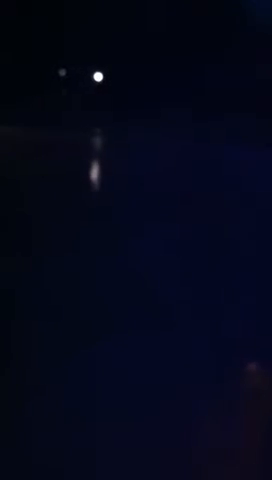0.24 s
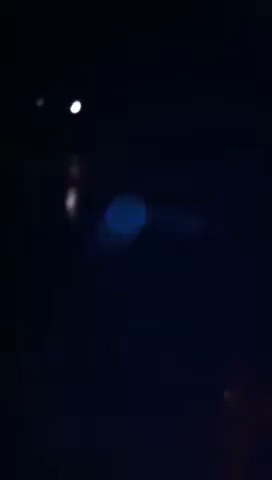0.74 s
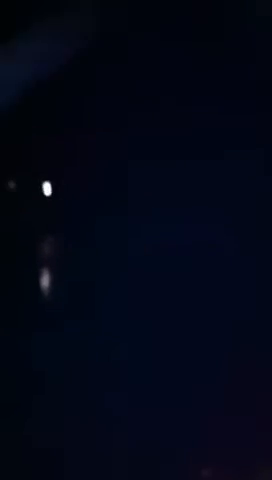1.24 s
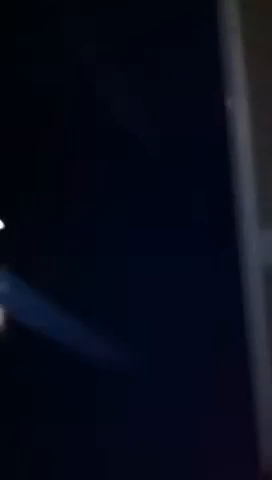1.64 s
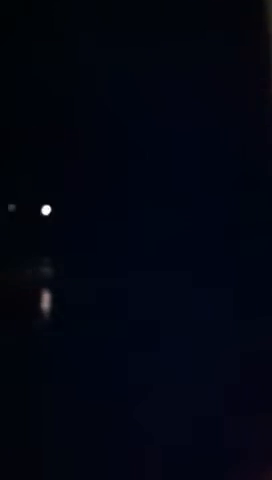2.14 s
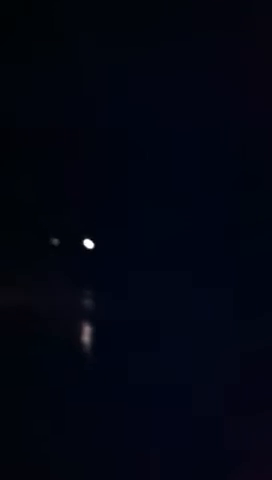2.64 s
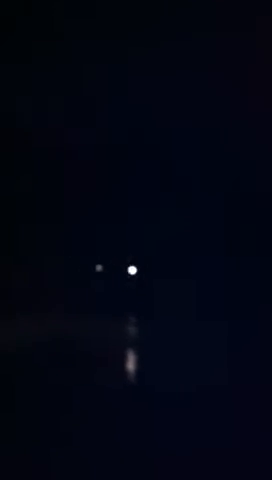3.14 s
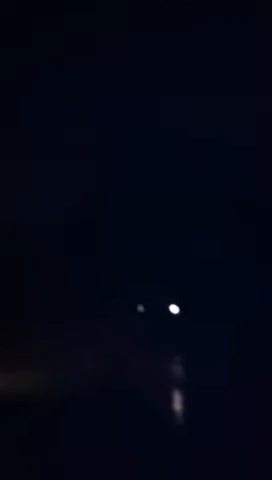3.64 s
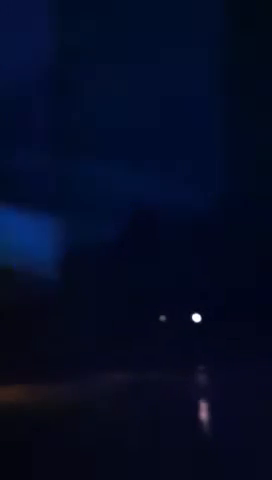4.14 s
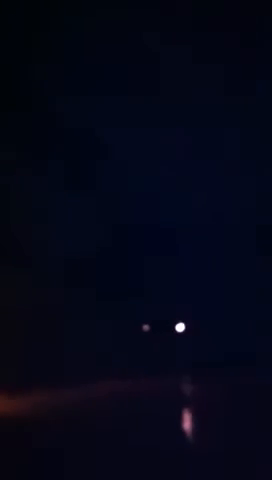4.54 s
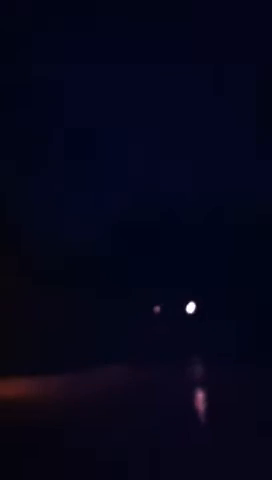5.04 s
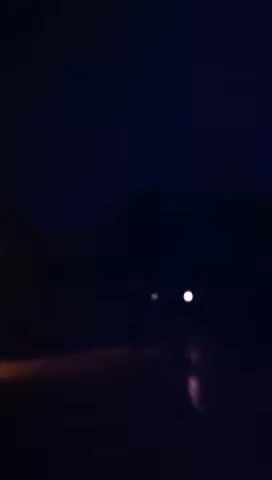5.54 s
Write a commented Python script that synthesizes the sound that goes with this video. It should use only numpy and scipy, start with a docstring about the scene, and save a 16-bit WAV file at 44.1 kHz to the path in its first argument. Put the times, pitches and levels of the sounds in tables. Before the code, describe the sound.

Deep thunder opens at full strength, stumbles through uneven bursts and rolls off into the distance. Water drops splat very near the microphone, irregular and bright, some loud, some faint, each with a short wet spray. Behind them is a quiet hiss and patter of street rain. The background dips briefly after four seconds, then the thunder grows again.

```python
"""Thunder over a rainy street

Thunder rolls away at night in steady rain, heard from a doorway: scattered shocks, dulled by distance.
Water dripping off the eaves splats on hard ground close by: slap, popping air pocket and spray.
Farther drops merge into a patter of click-driven puffs and a wash of noise with an unsteady spectrum."""
import sys
import numpy as np
from scipy import signal
from scipy.io import wavfile
from scipy.ndimage import uniform_filter1d

SR = 44100
rng = np.random.default_rng(int(sys.argv[2]) if len(sys.argv) > 2 else 0)


def wav_out(sig):
    """Save sig, one row per channel (or a flat mono array), as 16-bit PCM at SR to the path in sys.argv[1]."""
    wavfile.write(sys.argv[1], SR, np.round(np.clip(np.atleast_2d(sig).T, -1, 1) * 32767).astype(np.int16))


N = 255780

# Course of the thunder. Each row: time in seconds, level in dB before the deep lift,
# nearness from 0 to 1 (how much of the upper rumble survives the air).
THUNDER_COURSE = [(0, -15.5, 0.27), (.15, -12.5, 0.67), (.26, -15, 0.46), (.37, -14, 0.55), (.5, -17, 0.33),
                  (.6, -21.5, 0.28), (.72, -19, 0.4), (.82, -14.5, 0.78), (.87, -19.5, 0.3),
                  (1.05, -21, 0.5), (1.16, -18.5, 0.84), (1.24, -23.5, .5), (1.35, -25, 0.35),
                  (1.7, -27.5, 0.64), (2.05, -28, 0.3), (2.4, -24.5, .4), (2.7, -27, 0.45),
                  (3.4, -31.5, 0.45), (4.2, -31.5, 0.47), (4.9, -30.5, 0.54), (5.45, -31.5, 0.3),
                  (5.8, -25, 0.87)]
# Spectrum of near thunder before the doorway boom. Each row: frequency in Hz, relative density in dB per Hz.
NEAR_THUNDER = [(18, -68), (30, -40), (101, -23.5), (167, 0.5), (255, -2), (327, -9.5), (397, -11),
                (1100, -29.5), (1360, -31.5), (1500, -27.5), (1750, -37.5), (3000, -52), (3900, -50),
                (6600, -120)]
# Spectrum of far thunder before the doorway boom. Each row: frequency in Hz, relative density in dB per Hz.
FAR_THUNDER = [(18, -60), (30, -23.5), (91, -22.5), (157, -1), (228, -6), (379, -11.5), (447, -16.5),
               (509, -12.5), (1290, -25), (1500, -26), (1950, -64), (3300, -120)]
# Air modes of the doorway. Each row: frequency in Hz, half-width in Hz, boost in dB.
DOORWAY_MODES = [(158.4, 3.4, 6.5), (196, 4.3, 2.5), (295, 5.2, 1.5), (391, 30, 3.5)]
# Drips from the eaves. Each row: start in seconds, peak in dB, slap pitch in Hz, settled pop pitch in Hz,
# spray tilt in dB per octave, slap over spray in dB, pop over spray in dB (both before their fades).
EAVES_DRIPS = [(.055, -10, 3980, 1210, -2, 1, -2.5), (.1306, -7.5, 6300, 1190, -3.5, 1, -6),
               (.1628, -18, 9960, 869, -3, 8.5, 4), (.2294, -16, 2860, 934, 4, 9, -5),
               (.391, -17, 3060, 1600, -10, 8, 7), (.4305, -9.5, 6710, 1120, 1, 2.5, -14),
               (.4384, -10, 3450, 3450, -8, 16, 7), (.4985, -18, 11300, 1050, -5, 19, -5),
               (.5427, -2.5, 8600, 910, -4.5, 16.5, -21), (.575, -16, 4940, 931, -1, 1, -8),
               (.616, -17, 2500, 2500, -5, 8, -13), (.6578, -2, 6230, 1070, 3, 4, 6),
               (.6684, -9, 10500, 1570, 3, 16, 7), (.7203, -18, 5000, 956, -2.5, 16, -9),
               (.83, -15.5, 4030, 972, -2, 3, -14), (.92, -10.5, 5400, 2100, 0.5, 3.5, -2),
               (.9693, -9.5, 6560, 1160, -1, 9.5, -5), (1.037, -16.5, 11900, 869, 6, 7, -8),
               (1.249, -19.5, 2660, 896, 1, 15, -5), (1.3491, -14.5, 4040, 2820, -4.5, 4, 3),
               (1.4351, -18, 4630, 926, 11, -1, -10), (1.4536, -20, 9470, 1030, -1, 6, 9),
               (1.502, -14.5, 11000, 861, 3, 15, -1), (1.533, -2.5, 3100, 3050, -1.5, 4.5, -14),
               (1.5813, -21, 3960, 3280, -6, 14, -2), (1.6022, -16, 3560, 3120, -1.5, 5, -2),
               (1.668, -14.5, 7900, 1160, 2, 17, -2), (1.7127, -18, 3180, 1450, -5.5, 2, 4),
               (1.7687, -9.5, 3440, 3460, 5, -10, -9), (1.8689, -9, 8360, 2700, -5.5, 13.5, -6),
               (1.943, -8, 4470, 3150, -3.5, 12.5, 1), (1.9534, -10, 8090, 1900, -1, 0, -17),
               (2.0686, -11.5, 2930, 2870, -7, 4, 4.5), (2.161, -11.5, 4000, 3450, -3, 7.5, 1),
               (2.1936, -14, 3980, 2180, -3, 3, 4), (2.2664, -17.5, 2760, 964, -3.5, 7.5, -5),
               (2.3356, -6.5, 3380, 3380, -4, 0, -12), (2.361, -5.5, 10600, 3160, 3.5, 6, -13),
               (2.414, -17, 2700, 2680, -4, 3, 2), (2.4318, -9.5, 6500, 1620, -4.5, -5, -7),
               (2.4927, -17, 7130, 2730, 2, 8, -10), (2.5995, -13.5, 2960, 2960, -2.5, 3, -7),
               (2.7453, -15, 5630, 1900, -3, 6, -10), (2.7997, -10, 8000, 1950, -3, 12, -5),
               (2.8489, -20, 2820, 2180, -.5, 5, 7), (3.0328, -14.5, 5900, 2360, 0, 5, -8),
               (3.059, -14.5, 2900, 2870, -5, 2, -5), (3.1287, -16.5, 2690, 2690, -1.5, 0, 0),
               (3.1598, -8.5, 5570, 1590, 0.5, 3, -11), (3.249, -17, 6590, 1520, 0, 2, -10),
               (3.3852, -10, 3560, 1700, -2, 5, -6), (3.482, -18.5, 6690, 2150, -.5, 6, -5),
               (3.5316, -16, 3950, 3070, 2, 11, -5), (3.5857, -8, 3650, 1980, -1.5, 10, -9),
               (3.6185, -16, 5600, 1890, 2, 8, -8), (3.6724, -10, 8470, 1840, -.5, 8.5, -16),
               (3.7736, -9.5, 3320, 3400, 2.5, -3, -1), (3.8583, -11.5, 5770, 1040, 5, 16, -9),
               (3.9404, -11.5, 12900, 960, -0.5, 4, -3.5), (3.9567, -6, 9220, 1460, 0, 1, 2.5),
               (4.009, -15.5, 2500, 860, -5, 14, 1), (4.0597, -13.5, 10700, 3470, 6, 18, -9),
               (4.09, -6.5, 4930, 3440, -1, 7.5, 8), (4.0981, -4.5, 3510, 690, -9.5, 9, -0.5),
               (4.1194, -19, 3050, 1070, -9, 0, 10), (4.1909, -16.5, 3360, 3300, -4, 9, 6),
               (4.2718, -9, 2920, 2920, -2, -1, -7), (4.2947, -6.5, 3120, 1840, -1, 13.5, 1),
               (4.2977, -8, 2740, 1920, -4, 13, 0), (4.4383, -20, 3580, 2220, -7, 14.5, 6),
               (4.5353, -12.5, 3250, 1580, -2, 7, 1), (4.5875, -11.5, 10000, 1670, -2, 1, -0.5),
               (4.6784, -11.5, 6470, 3450, -2.5, 10.5, 3), (4.698, -11, 5620, 3480, 13, 2, -18),
               (4.724, -16, 2540, 1140, -7.5, 4.5, 4.5), (4.788, -16.5, 5050, 1380, -2.5, 8, -11),
               (4.8722, -17, 9750, 1770, 6, 0, -15), (4.9725, -14.5, 4130, 853, -4.5, 6, -8),
               (5.0389, -8.5, 11700, 1580, 2, 3, -4.5), (5.125, -14.5, 2730, 2680, -4, 9, 3),
               (5.146, -16.5, 4810, 1000, 1, 13, -1), (5.1926, -15.5, 4970, 1600, -5, 3, -1),
               (5.2012, -15, 3580, 1490, -2, 7, -5), (5.2623, -16.5, 2520, 1030, -2, -7, 3),
               (5.2995, -15.5, 4120, 2280, -5, 3, 2), (5.3288, -16.5, 6800, 1890, -8, 9, -2),
               (5.4506, -8, 3120, 1210, -2, 5.5, -5.5), (5.5823, -18, 3400, 3520, -4, 6, 11)]
# Spectrum of splashing water. Each row: frequency in Hz, relative density in dB per Hz.
SPLASH_SPECTRUM = [(150, -81), (400, -29.5), (900, -4.5), (1600, -3), (3000, 0), (6000, 3.5), (10000, 3),
                   (16000, 2.5)]
# Swell of the street rain. Each row: time in seconds, level in dB shared by wash and patter.
RAIN_COURSE = [(0, -32), (.8, -37), (1.15, -36), (1.5, -34), (2.0, -34.5), (2.9, -33.5), (4.15, -31.5),
               (4.7, -33.5), (4.95, -37.5), (5.2, -34), (5.8, -35.5)]
# Mean spectrum of the far rain. Each row: frequency in Hz, relative density in dB per Hz.
WASH_SPECTRUM = [(290, 0.5), (500, 0), (620, -1), (802, -4), (1340, -3.5), (1790, -4), (5620, -6.5),
                 (7270, -11), (10100, -8), (15300, -13)]

# Lift of the thunder's deepest part: dB at a level of -25.5 dB, and further dB per dB of level.
DEEP_DB, DEEP_PER_DB = 1, 0.51
# Spray's 60 dB fade at a peak of -9 dB, and its change in s per dB: fainter drips are farther and ring longer.
SPRAY_T60_S, T60_PER_DB = .1, -.004
# Faint drips: middle peak level and spread either way, tilt either way in dB per octave, slap and pop over spray.
FAINT_COUNT = 40
FAINT_DB, FAINT_SPREAD_DB, FAINT_TILT_DB, FAINT_SLAP_DB, FAINT_POP_DB = -21, 5, 3.5, 1.5, -7
# Roll and rain dip together after a loud drip: start, depth, then fall, hold and return times.
DIP_S, DIP_DB, DIP_FALL_S, DIP_HOLD_S, DIP_BACK_S = 4.3, -5.5, .03, 0.24, 0.16


def gain_of(db):
    """Logarithmic level: every 20 dB is a tenfold amplitude."""
    return 10 ** (np.asarray(db) / 20)


def evened(x):
    """Normalization: equal rms means equal mean power, here 1."""
    return x / np.sqrt(np.mean(x ** 2) + 1e-20)


def bins(size):
    """Discrete spectrum: the frequencies in Hz of a real transform."""
    return np.fft.rfftfreq(size, 1 / SR)


def read(points, hz):
    """Logarithmic pitch: spectrum points are joined on a log-frequency axis."""
    f, value = np.transpose(points)
    return np.interp(np.log(hz + 1), np.log(f + 1), value)


def coloured(x, db):
    """Minimum-phase filter: the phase of a causal response follows from its log gain."""
    both_sides_db = np.concatenate([db, db[-2:0:-1]])
    log_gain = np.log(gain_of(np.maximum(both_sides_db, -100)))
    response = np.exp(np.conj(signal.hilbert(log_gain)))
    taps = np.fft.ifft(response).real
    return signal.oaconvolve(x, taps[:len(db)])[:len(x)]


def band(x, hz, width):
    """Resonance: a band around one pitch is selected; width is a share of that pitch."""
    edges = np.clip([hz / (1 + width), hz * (1 + width)], 100, .45 * SR)
    return evened(signal.sosfilt(signal.butter(1, edges, "bandpass", fs=SR, output="sos"), x))


def clicks(per_s, spread_db):
    """Shot noise: independent impulses of either sign, a few of them large."""
    sign, chance = rng.choice([-1., 1.], N), rng.random(N)
    size_db = spread_db * np.minimum(rng.exponential(1, N), 4)
    return sign * (chance < per_s / SR) * gain_of(size_db)


def add(mix, s, sound):
    """Superposition: pressures add, from time s on."""
    part = mix[round(s * SR):][:len(sound)]
    part += sound[:len(part)]


def thunder():
    """Scattered arrivals: shocks from all along the channel, dulled by distance; the doorway booms."""
    s, *columns = np.transpose(THUNDER_COURSE)
    level_db, near = (np.interp(np.arange(N) / SR, s, c) for c in columns)
    near, hz = np.clip(near, 0, 1), bins(size=16384)
    shocks = clicks(per_s=4000, spread_db=1.5)
    boom_db = sum(db / (1 + ((hz - f) / width) ** 2) for f, width, db in DOORWAY_MODES)
    sharp = evened(coloured(shocks, read(NEAR_THUNDER, hz) + boom_db))
    dull = evened(coloured(shocks, read(FAR_THUNDER, hz) + boom_db))
    roll = surging(near * sharp + (1 - near) * dull, patchy_db=2.0)
    deep = signal.sosfiltfilt(signal.butter(2, 125, fs=SR, output="sos"), roll)
    deep_lift_db = DEEP_DB + DEEP_PER_DB * (level_db + 25.5)
    return gain_of(level_db) * (roll - deep + gain_of(deep_lift_db) * deep)


def surging(x, patchy_db):
    """Source geometry: bends of the channel favour now one pitch range, now another."""
    z = signal.stft(x, nperseg=2048, noverlap=1536)[2]
    patches = rng.standard_normal(z.T.shape)  # time by frequency
    patches = uniform_filter1d(patches, size=9, axis=0)
    patches = evened(uniform_filter1d(patches, size=4, axis=1))
    return signal.istft(z * gain_of(patchy_db * patches).T, nperseg=2048, noverlap=1536)[1][:N]


def drip(peak_db, slap_hz, pop_hz, tilt_db, slap_db, pop_db):
    """Drop impact: a slap, the pop of trapped air, then a crown of droplets in a darkening spray."""
    t, hz = np.arange(6000) / SR, bins(size=1024)
    hiss, air, smack = rng.standard_normal((3, len(t)))
    # Droplets tick at random moments in four bands of random pitch.
    landings = (rng.random((4, len(t))) < 70 / SR) * rng.standard_normal((4, len(t)))
    droplets = sum(band(x, f, 0.14) for x, f in zip(landings, rng.uniform(1580, 13200, 4))) / 2

    fade_db = -60 * t / max(SPRAY_T60_S + T60_PER_DB * (peak_db + 9), .02)
    colour_db = read(SPLASH_SPECTRUM, hz) + tilt_db * np.log2(np.maximum(hz, 1000) / 4000)
    bright = evened(coloured(hiss + 0.66 * droplets, colour_db))
    dark = evened(coloured(bright, -3. * np.log2(1 + hz / 2500)))
    late = 1 - np.exp(-t / 0.028)  # the fine mist settles first
    spray = (1 - late) * bright + late * dark
    spray = spray * gain_of(fade_db) * (1 - np.exp(-t / 0.0014))

    slap = band(smack, slap_hz, 0.37)
    slap = slap * gain_of(slap_db - 60 * t / 0.014) * (1 - np.exp(-t / 0.00063))

    sinking = np.exp(-t / 0.012)  # the pocket of air widens, so its pitch falls
    early_pop = band(air, 1.234 * pop_hz, 0.15)
    settled_pop = band(band(air, pop_hz, 0.07), pop_hz, 0.76)
    pop = sinking * early_pop + (1 - sinking) * settled_pop
    pop = pop * gain_of(pop_db + 1.23 * fade_db) * (1 - np.exp(-t / 0.0039))

    splat = slap + spray + pop
    return gain_of(peak_db) * splat / abs(splat).max()


def faint_drips():
    """Random arrivals: small drips at independent moments, each with its own pitches and colour."""
    when, size, slap, pop, tilt = rng.random((FAINT_COUNT, 5)).T
    start_s = when * N / SR
    peak_db = FAINT_DB + FAINT_SPREAD_DB * (2 * size - 1)
    slap_hz, pop_hz = 2600 * 4.0 ** slap, 870 * 3.6 ** pop
    tilt_db = FAINT_TILT_DB * (2 * tilt - 1)
    slap_db, pop_db = np.full(FAINT_COUNT, FAINT_SLAP_DB), np.full(FAINT_COUNT, FAINT_POP_DB)
    return np.transpose([start_s, peak_db, slap_hz, pop_hz, tilt_db, slap_db, pop_db])


def rain():
    """Superposed drops: wash and patter swell together under one level."""
    s, level_db = np.transpose(RAIN_COURSE)
    level = gain_of(np.interp(np.arange(N) / SR, s, level_db))
    return level * (gain_of(0.43) * wash() + gain_of(-6.5) * patter())


def patter():
    """Impulse response: middle-distance drops are puffs of twelve pitches, each driven by its own clicks."""
    t, out = np.arange(1500) / SR, np.zeros(N)
    for hz in np.geomspace(1500, 13000, num=12):
        ring = np.sin(2 * np.pi * hz * t) * gain_of(-60 * t * hz / 7.8)  # dies in a few cycles
        puff = 0.55 * rng.standard_normal(len(t)) * gain_of(-60 * t / 0.027)
        drop = ring * hz ** 0.31 / 12 + puff
        out += signal.oaconvolve(clicks(per_s=30, spread_db=6.5), drop)[:N]
    return evened(coloured(out, read(SPLASH_SPECTRUM, bins(size=1024))))


def wash():
    """Gaussian noise: far rain as random short-time spectra, with drifting patches and a shared flicker."""
    frames = N // 128 + 5
    a, b, patches = rng.standard_normal((frames, 257, 3)).T  # each frequency by time
    patches = uniform_filter1d(patches, size=8, axis=0)
    patches = evened(uniform_filter1d(patches, size=14, axis=1))
    flicker = evened(uniform_filter1d(rng.standard_normal(frames), size=6))  # the same at all pitches
    unsteady_db = 1.6 * patches + 1.2 * flicker
    mean_db = read(WASH_SPECTRUM, bins(size=512))[:, None]
    z = (a + 1j * b) * gain_of(mean_db + unsteady_db)
    return evened(signal.istft(z, nperseg=512, noverlap=384)[1][:N])


def dip():
    """Level envelope: a common gain falls quickly, stays low, and comes back."""
    corners_s = np.cumsum([DIP_S, DIP_FALL_S, DIP_HOLD_S, DIP_BACK_S])
    return gain_of(np.interp(np.arange(N) / SR, corners_s, [0, DIP_DB, DIP_DB, 0]))


def scene():
    """Superposition: near drips stand over the bed of thunder and street rain, which alone dips."""
    near = np.zeros(N)
    bed = dip() * (thunder() + rain())
    for s, *rest in [*EAVES_DRIPS, *faint_drips()]:
        add(near, s, drip(*rest))
    return (bed + near)[None]


def record(dry):
    """Microphone response: the lowest bass steps down, a soft knee rounds peaks, then the band limit."""
    high = signal.sosfiltfilt(signal.butter(8, 74, "highpass", fs=SR, output="sos"), dry)
    thin = high + gain_of(-11.5) * (dry - high)
    over = np.maximum(abs(thin) - .55, 0)  # the excess above the knee
    held = thin - np.sign(thin) * (over - .2 * np.tanh(over / .2))
    band_limit = signal.firwin(511, 15750, window=("kaiser", 9), fs=SR)  # lowpass edge in Hz
    return signal.oaconvolve(held, band_limit[None], "same")


dry = scene()
out = record(dry)
wav_out(out)
```